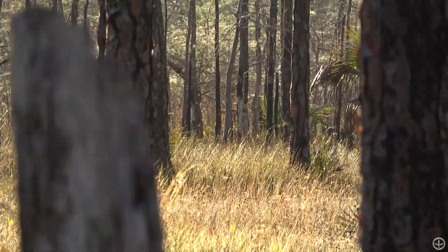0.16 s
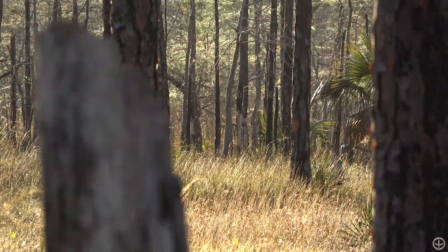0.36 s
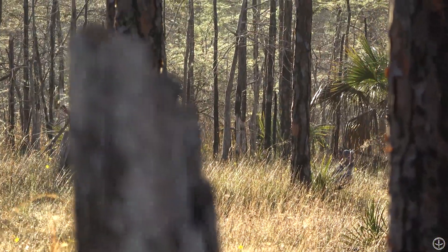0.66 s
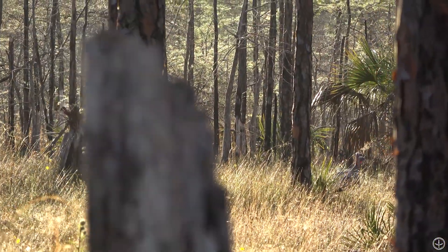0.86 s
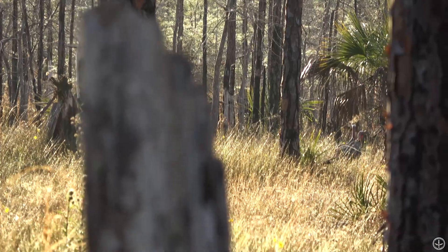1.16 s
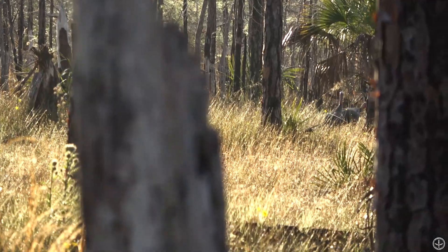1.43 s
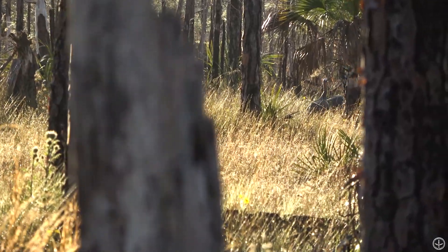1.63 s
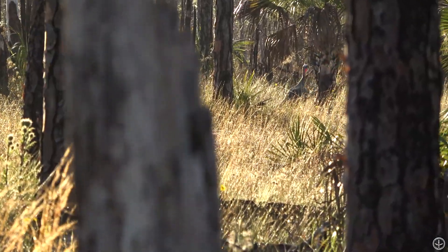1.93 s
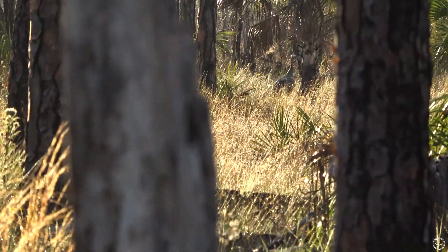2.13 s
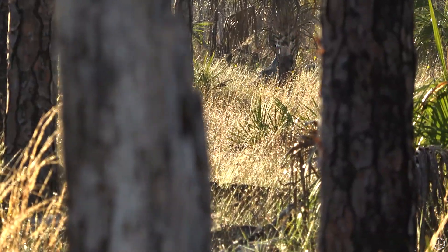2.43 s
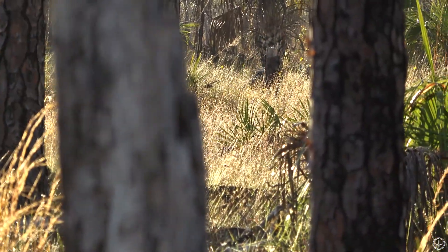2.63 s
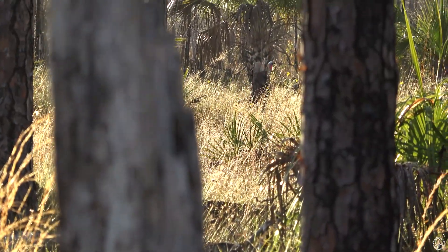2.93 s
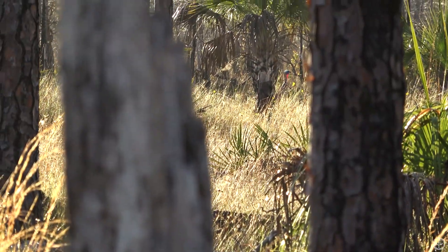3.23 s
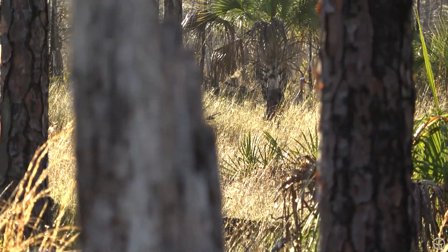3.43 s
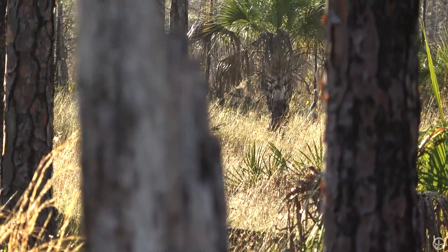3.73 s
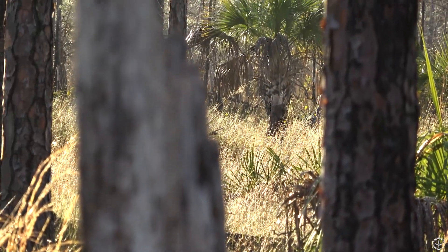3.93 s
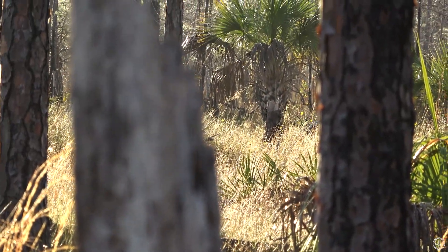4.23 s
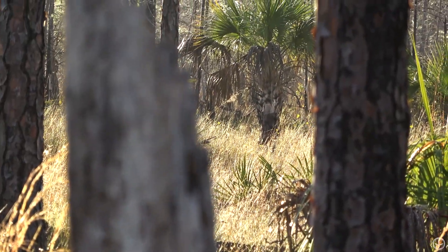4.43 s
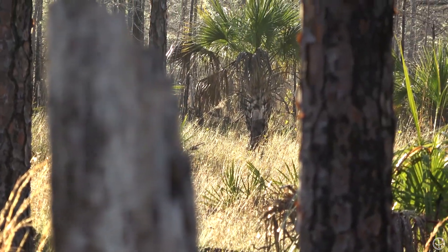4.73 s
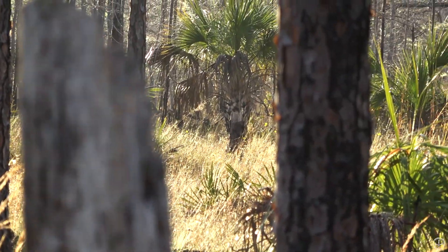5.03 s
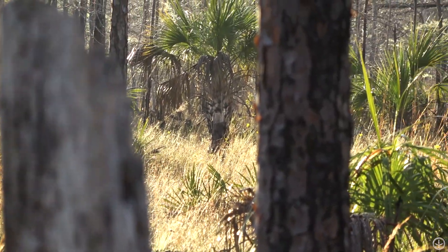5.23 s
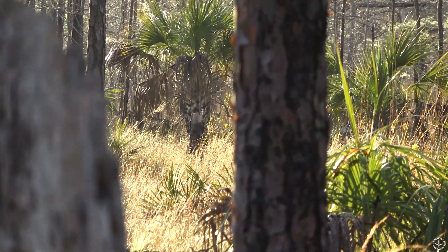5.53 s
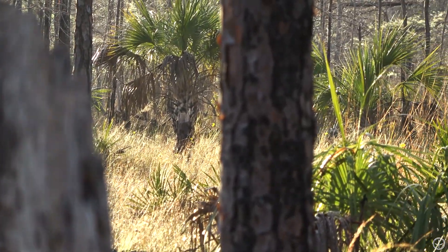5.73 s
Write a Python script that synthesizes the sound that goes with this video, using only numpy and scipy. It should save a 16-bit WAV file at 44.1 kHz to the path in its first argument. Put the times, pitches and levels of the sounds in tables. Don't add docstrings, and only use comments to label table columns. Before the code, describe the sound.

Open pine woods, quiet and airy, with a soft wind moan, faint leaf rustle and thin high insect hiss. A hand-held microphone adds irregular very low rumble throughout, strongest in the first two seconds, with dull thumps near 0.9, 1.4 and 2.2 s. Small twig ticks come at 0.3, 0.4 and 2.1 s; a faint cricket trills from 0.8 to 1.2 s. A songbird whistles short notes that leap up and fall, at 2.3, 2.8, 3.2 and 3.6 s, each louder. From 2.9 to 3.7 s a woodpecker drums about fourteen quick, even, hollow knocks, roughly sixteen per second, swelling slightly at first, with a dull echo dying away among trunks. Afterwards distant birds give long falling whistles around 3.7, 4.4, 5.0 and 5.7 s, with thin high calls near 4.2 s. Low, soft calls appear after 5.5 s, and bumps at 5.4 and 5.9 s.

```python
import sys
import numpy as np
from scipy import signal
from scipy.fft import rfft, irfft, next_fast_len
from scipy.io import wavfile
from scipy.ndimage import uniform_filter1d

SR = 44100
rng = np.random.default_rng(int(sys.argv[2]) if len(sys.argv) > 2 else 0)


def volts(x):
    e = np.asarray(x, float) / 20
    return 10 ** e


def output_pcm(signal):
    pcm = np.clip(np.atleast_2d(signal).T, -1, 1) * 32767
    wavfile.write(sys.argv[1], SR, np.round(pcm).astype(np.int16))


N = 258867
t = np.arange(N) / SR


def band(x, hz, width):
    return signal.lfilter(*signal.iirpeak(hz, hz / width, fs=SR), x)


def narrow_noise(hz, width):
    return band(band(rng.standard_normal(N), hz, width), hz, width)


def lowpass(x, order, hz):
    return signal.lfilter(*signal.butter(order, hz, fs=SR), x)


def highpass(x, hz):
    return signal.lfilter(*signal.butter(2, hz, "high", fs=SR), x)


def level(x, db):
    return x * volts(db) / np.sqrt(np.mean(x ** 2))


def curve(rows, column, outside=-150):
    rows = np.array(rows)
    return np.interp(t, rows[:, 0], rows[:, column], outside, outside)


def walk(rate):
    hold = int(SR / rate)
    steps = np.repeat(rng.standard_normal(N // hold + 1), hold)
    return 1.328 * uniform_filter1d(uniform_filter1d(steps, hold), hold)[:N]


def coloured(points):
    hz, db = np.transpose(points)
    size = next_fast_len(N)
    log_bins = np.log(np.maximum(np.arange(size // 2 + 1) * SR / size, 1))
    gain = volts(np.interp(log_bins, np.log(hz), db))
    return irfft(rfft(rng.standard_normal(size)) * gain, size)[:N]


def tone(hz):
    return np.sin(2 * np.pi * np.cumsum(hz) / SR)


def add(out, s, sound):
    i = int(s * SR)
    out[i:i + len(sound)] += sound[:N - i]


def spells(rows, rest_db):
    return volts(rest_db) + sum(volts(db) * np.exp(-((t - s) / half) ** 2) for s, half, db in rows)


# freq_hz [Hz], density_db [dB per Hz]
AIR_SPECTRUM = [(71, -30.5), (120, -3), (147, -0.5), (200, -6), (282, -1.5), (441, -5), (649, -7),
                (936, -6), (1380, -8.5), (1870, -15.5), (2640, -15), (3730, -23), (4770, -18.5),
                (7020, -26), (15500, -26)]
AIR_DB = -63.5
# time_s [s], level_db [dB]
BREEZE = [(0.0, -69.5), (0.75, -67), (1.62, -70.5), (1.78, -72.5), (2.29, -71.5), (2.76, -74), (3.11, -72),
          (3.55, -77), (3.89, -67.5), (4.86, -70), (5.12, -68), (5.87, -69)]
# time_s [s], level_db [dB]
LEAVES = [(0, -79), (.5, -82), (1.3, -82), (2.2, -81), (3.9, -78), (4.8, -78), (5.87, -78)]


def woods():
    moan = narrow_noise(650, 110) * volts(1.6 * walk(22))
    leaves = narrow_noise(2500, 1800) * volts(1.5 * walk(12))
    air = level(coloured(AIR_SPECTRUM) * volts(0.24 * walk(2.98)), AIR_DB - 1.5)
    moan = level(moan, -0.86) * volts(curve(BREEZE, column=1))
    return air + moan + level(leaves, 0) * volts(curve(LEAVES, column=1))


# centre_hz [Hz], width_hz [Hz], level_db [dB], throb_hz [Hz]
CHORUS = [
    (4560, 420, -82.5, 56),
    (5005, 90, -86, 50),
    (5543, 160, -86, 58),
    (5970, 450, -86, 63),
]
# time_s [s], level_db [dB]
CICADA = [(0, -90), (.7, -79.5), (2.0, -82.5), (2.2, -90), (4, -82.5), (5.87, -89)]
# time_s [s], level_db [dB], chirp_rate_hz [chirps per s]
CRICKET = [
    (.78, -95, 81),
    (.8, -78, 81),
    (1.0, -79, 79),
    (1.17, -79, 77.6),
    (1.22, -95, 77.6),
]


def insects():
    out = np.zeros(N)
    for hz, width, db, throb in CHORUS:
        strokes = 1 + 0.34 * tone(throb + walk(2.5))
        out += level(narrow_noise(hz, width) * strokes, db)
    singer = volts(1.8 * walk(30)) * tone(4700 + 25 * walk(40))
    singer = singer * (1 + .5 * tone(37.4 + 0.22 * walk(2.4)))
    out += level(singer, -1.5) * volts(curve(CICADA, column=1))
    chirps = np.maximum(tone(curve(CRICKET, column=2, outside=90)) - .2, 0) * volts(2.0 * walk(38.8))
    cricket = chirps * tone(5520 + 40 * walk(30))
    return out + level(cricket, 0) * volts(curve(CRICKET, column=1))


# freq_hz [Hz], density_db [dB per Hz]
SHAKE_SPECTRUM = [(12, -35.5), (20, 1.5), (41, -10), (64, -10.5), (99, -13.5), (130, -30.5), (170, -55),
                  (290, -120)]
SHAKE_DB = -56.5
# top_s [s], half_length_s [s], level_db [dB rms]
TREMORS = [(.2, 0.18, -37), (.59, 0.082, -35.5), (.84, 0.045, -41.5), (1.12, 0.19, -37.5),
           (1.55, 0.14, -35), (1.88, 0.21, -43.5), (2.27, .06, -45), (2.5, 0.028, -46), (2.8, 0.19, -41),
           (3.38, .12, -46.5), (3.74, 0.13, -41), (4.0, 0.17, -48), (4.35, 0.16, -36.5), (4.68, 0.093, -42),
           (5.0, 0.13, -42), (5.24, 0.12, -37.5), (5.43, 0.075, -39.5), (5.69, 0.13, -44.5)]
TREMOR_HZ, TREMOR_REST_DB = 14.1, -50
# top_s [s], half_length_s [s], level_db [dB rms]
RINGS = [(.33, .04, -57.5), (.48, .04, -52.5), (.6, 0.037, -56), (.76, 0.07, -59), (.93, 0.047, -49.5),
         (1.05, 0.012, -49.5), (1.19, 0.053, -52), (1.45, .05, -53.5), (1.65, 0.095, -57),
         (2.04, 0.077, -58.5), (2.22, 0.11, -57.5), (2.38, 0.052, -52.5), (2.67, 0.026, -67),
         (2.97, 0.027, -73), (3.1, 0.028, -56), (3.2, 0.058, -49), (3.6, 0.053, -55), (4.03, 0.13, -62.5),
         (4.18, 0.018, -55), (4.41, 0.088, -60), (4.62, 0.032, -60), (5.03, .05, -71), (5.19, 0.02, -56),
         (5.31, 0.037, -62), (5.6, .07, -58), (5.71, 0.035, -52.5), (5.81, 0.044, -55.5)]
BODY_HZ, BODY_REST_DB = 79.2, -67.5
# start_s [s], peak_db [dB], pitch_hz [Hz]
BUMPS = [
    (0.872, -40.5, 58.4),
    (1.387, -37.5, 55),
    (2.189, -43, 80),
    (2.339, -64, 73),
    (5.417, -41.5, 80.7),
    (5.862, -34, 38.3),
]


def handling():
    out = level(coloured(SHAKE_SPECTRUM) * volts(2.0 * walk(5.5)), SHAKE_DB + 0.5)
    out += np.sqrt(2) * spells(TREMORS, TREMOR_REST_DB) * tone(TREMOR_HZ + .6 * walk(6.8))
    body = tone(BODY_HZ + 2.12 * walk(4.3) + 1.405 * walk(12))
    out += np.sqrt(2) * spells(RINGS, BODY_REST_DB) * volts(1.12 * walk(16)) * body
    u = t[:SR // 5]
    for s, db, hz in BUMPS:
        thump = np.sin(2 * np.pi * hz * u) * (u / 0.016) * np.exp(1 - u / 0.0088)
        add(out, s, volts(db) * thump)
    return out


# start_s [s], peak_db [dB], centre_hz [Hz], width_hz [Hz], t60_s [s]
SNAPS = [(0.2619, -50.5, 1190, 300, 0.02), (.262, -56, 4200, 1400, .02), (.432, -55, 1840, 600, 0.022),
         (2.057, -50, 500, 701.8, 0.013), (2.058, -56.5, 5533, 1500, 0.017), (2.058, -52, 3331, 1990, .015),
         (2.058, -57, 12000, 4000, .008), (2.1785, -52, 694, 200, 0.022), (3.14, -59, 201.2, 79.5, 0.097),
         (3.724, -57.5, 3950, 404, 0.017), (4.53, -60, 1395, 308, 0.037), (4.66, -57, 5240, 353, 0.065),
         (4.66, -63, 5800, 800, 0.034), (4.671, -61.5, 5300, 1400, 0.4), (5.12, -65, 11530, 4000, 0.044)]


def snaps():
    out, u = np.zeros(N), t[:SR // 4]
    for s, db, hz, width, t60 in SNAPS:
        burst = rng.standard_normal(len(u)) * 1000. ** (-u / t60)
        burst = band(band(burst, hz, 1.64 * width), hz, 1.64 * width)
        add(out, s, volts(db) * burst / np.abs(burst).max())
    return out


def whistler(shape, song):
    out, u = np.zeros(N), np.arange(shape[0][0], shape[-1][0], 1 / SR)
    s, hz, db = np.transpose(shape)
    for start, note_db, ratio in song:
        pitch = uniform_filter1d(np.interp(u, s, hz), size=200) * ratio
        add(out, start + u[0], volts(note_db + np.interp(u, s, db)) * tone(pitch))
    return out


# time_s [s from its start], pitch_hz [Hz], level_db [dB]
SLIDE = [(0, 4100, -16), (.015, 3850, -5), (.045, 3400, -1), (.11, 3100, -4), (.17, 2800, 0),
         (.24, 2450, -1), (.3, 2050, 0), (.33, 1950, -20)]
# start_s [s], level_db [dB], pitch_ratio [1]
SLIDES = [
    (3.74, -79, 1.0),
    (4.355, -79.5, 1.02),
    (4.99, -79, 1.0),
    (5.65, -79.5, 0.98),
]
# start_s [s], length_s [s], start_hz [Hz], end_hz [Hz], level_db [dB]
CHIPS = [(1.673, .032, 2720, 2725, -86), (1.949, .026, 2417, 2520, -86), (2.432, 0.068, 1900, 2960, -72),
         (2.491, .025, 2380, 2150, -77), (2.507, 0.032, 2595, 2910, -78), (2.62, 0.024, 2880, 2700, -77),
         (2.732, 0.0093, 5330, 5200, -70), (4.144, .03, 2826, 3080, -76), (4.165, .013, 3500, 3846, -81),
         (4.202, 0.021, 6150, 6450, -70.5), (4.947, 0.033, 2750, 2410, -78.5),
         (5.411, 0.032, 2380, 2694, -75), (5.416, .029, 2983, 3370, -87), (5.538, 0.041, 1107, 1390, -69),
         (5.56, 0.37, 1350, 1317, -81.5), (5.585, .03, 1230, 1130, -69), (5.8, 0.01, 1900, 1800, -67.5),
         (5.832, 0.021, 1800, 1930, -68.5), (5.815, 0.12, 1260, 1360, -64.5)]
# start_s [s], start_hz [Hz], level_db [dB]
SEETS = [
    (.095, 6700, -81),
    (1.113, 6600, -88),
    (2.102, 6900, -88),
    (4.123, 6440, -77),
    (4.208, 6250, -75),
    (4.59, 6700, -80),
]
SEET_S, SEET_RISE = .025, 1.18
# time_s [s from its start], length_s [s], start_hz [Hz], end_hz [Hz], level_db [dB]
PHRASE = [
    (0, 0.042, 3450, 3556, -3),
    (0.04, .035, 2890, 2640, 3),
    (.08, .045, 2440, 2420, 2.5),
]
# start_s [s], level_db [dB]
PHRASES = [
    (3.91, -78),
    (4.25, -78),
]


def far_birds():
    out = whistler(SLIDE, SLIDES) * volts(3.5 + 2 * walk(25))
    calls = CHIPS + [(s, SEET_S, hz, hz * SEET_RISE, db) for s, hz, db in SEETS]
    for s, db in PHRASES:
        calls = calls + [(s + lag, length, hz0, hz1, db + note_db) for lag, length, hz0, hz1, note_db in PHRASE]
    for s, length, hz0, hz1, db in calls:
        size = int(length * SR)
        add(out, s, volts(db + 6) * np.hanning(size) ** 0.31 * tone(np.geomspace(hz0, hz1, size)))
    return out * volts(2.5 * walk(90))


# time_s [s from its top], pitch_hz [Hz], level_db [dB]
NOTE = [(-.034, 2150, -54), (-.024, 2334, 2.5), (-.008, 2750, -0.5), (0, 3002, 6), (.018, 2230, 4),
        (.04, 2051, 0.5), (.07, 1872, 0.5), (.104, 1712, -8), (.118, 1710, -24)]
# top_s [s], level_db [dB], pitch_ratio [1]
SONG = [
    (2.334, -72.5, 1.0),
    (2.783, -64, 0.97),
    (3.191, -59.5, 0.94),
    (3.586, -57, 0.96),
]


def songbird():
    return whistler(NOTE, SONG)


# start_s [s], peak_db [dB]
KNOCKS = [(2.891, -44.5), (2.945, -40.5), (3.0, -40.5), (3.06, -38), (3.12, -37.5), (3.183, -37),
          (3.245, -37.5), (3.307, -38), (3.372, -37), (3.435, -36.5), (3.498, -37.5), (3.56, -38),
          (3.626, -37), (3.688, -39)]
# freq_hz [Hz], level_db [dB], t60_s [s], rise_s [s]
TRUNK = [(856, 4.5, 0.021, 0.00035), (1419, 0.5, 0.016, 0.00061), (1933, -10, 0.027, 0.00056),
         (2150, -12, 0.013, .0003), (2750, -10, 0.016, 0.00041), (2960, -13.5, 0.017, 0.00045),
         (4650, -23, 0.014, .0002), (1040, -19, 0.0088, 0.00048)]
# delay_s [s], level_db [dB]
ECHOES = [
    (.037, -16),
    (0.0077, -15.5),
]


def drumming():
    out, u = np.zeros(N), t[:SR // 10]
    for s, db in KNOCKS:
        blow = np.zeros(len(u))
        for hz, mode_db, t60, rise in TRUNK:
            detune, stress = rng.standard_normal(2)
            ring = np.sin(2 * np.pi * hz * (1 + 0.015 * detune) * u)
            swell = 1 - np.exp(-u / rise)
            blow += volts(mode_db + 0.91 * stress) * ring * 1000. ** (-u / t60) * swell
        add(out, s - .0007, volts(db - 3) * blow)
    out = highpass(highpass(out, 560), 620)
    return out + sum(volts(db) * np.roll(out, int(lag * SR)) for lag, db in ECHOES)


FOREST_T60_S, FOREST_DB, FOREST_HZ = 1, -6.5, 3500


def forest(x):
    u = t[:SR]
    cloud = rng.standard_normal(SR) * 1000. ** (-u / FOREST_T60_S) * (1 - np.exp(-u / 0.0067))
    cloud = lowpass(cloud, 1, FOREST_HZ)
    return signal.fftconvolve(x, volts(FOREST_DB) * cloud / np.sqrt(np.sum(cloud ** 2)))[:N]


def scene():
    background = woods() + insects() + handling()
    near, far, song, drum = snaps(), far_birds(), songbird(), drumming()
    dull_drum = lowpass(drum, 2, 2340)
    scatter = forest(volts(-6.0) * dull_drum + song + volts(-5.5) * far + 0.36 * near)
    return (background + near + far + song + drum + scatter)[None]


def low_pass(x):
    return signal.sosfilt(signal.butter(12, 15660, fs=SR, output="sos"), x)


def record(dry):
    mix = lowpass(dry, 1, 13500)
    return low_pass(mix)


dry = scene()
out = record(dry)
output_pcm(out)
```